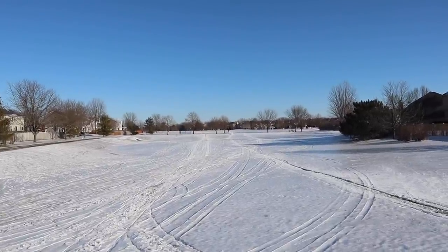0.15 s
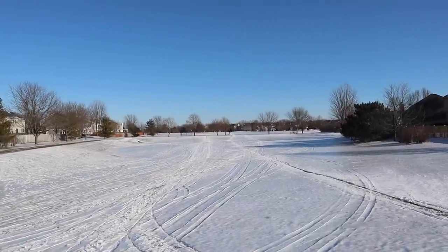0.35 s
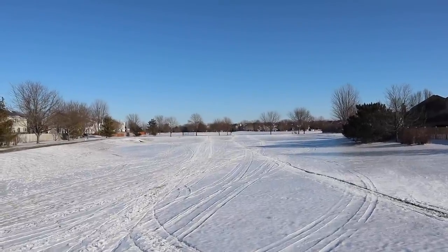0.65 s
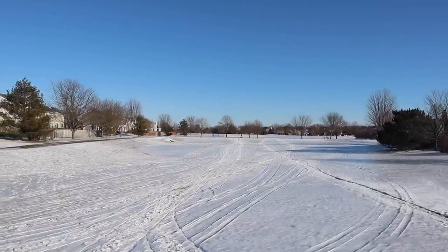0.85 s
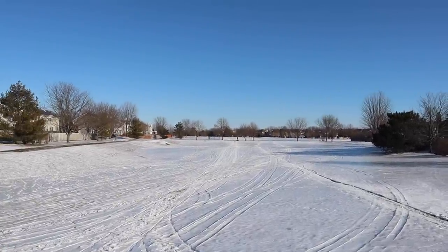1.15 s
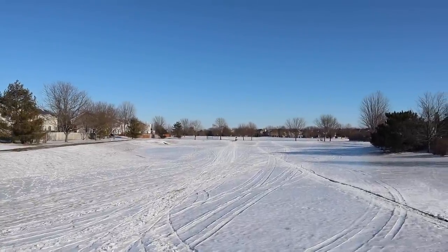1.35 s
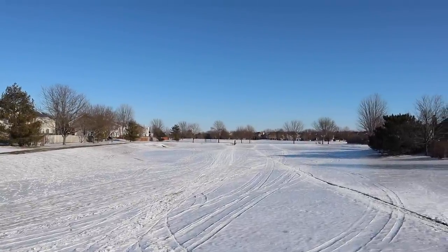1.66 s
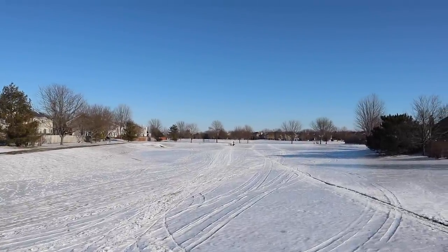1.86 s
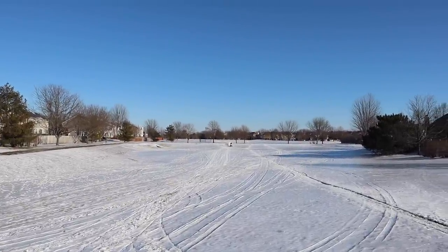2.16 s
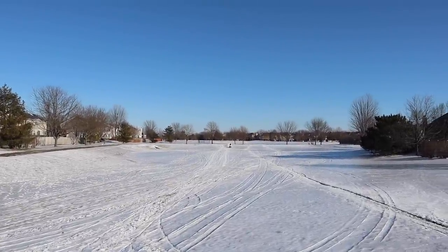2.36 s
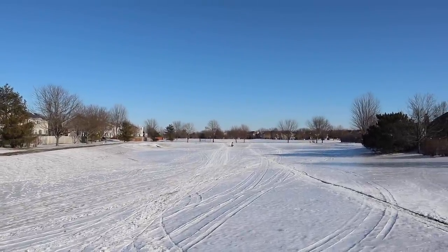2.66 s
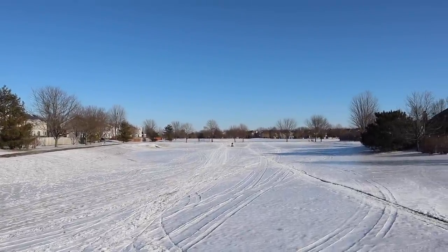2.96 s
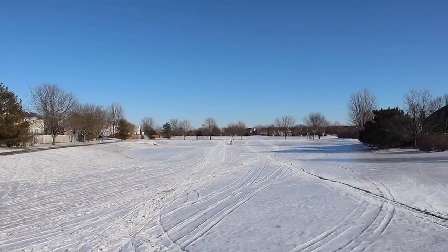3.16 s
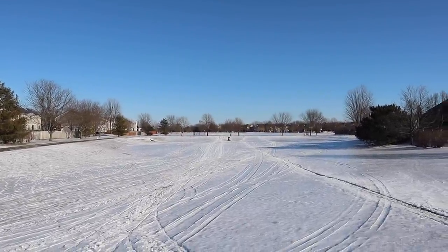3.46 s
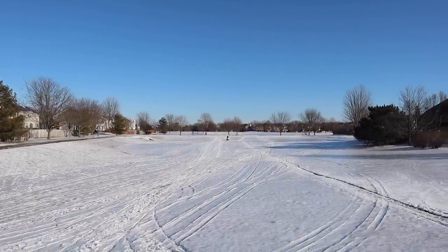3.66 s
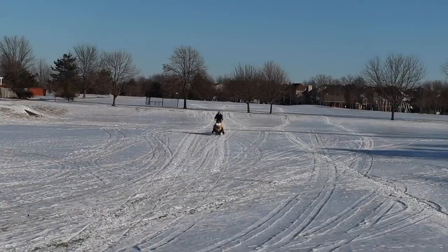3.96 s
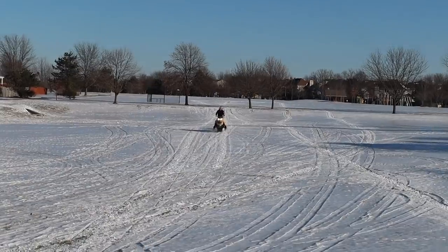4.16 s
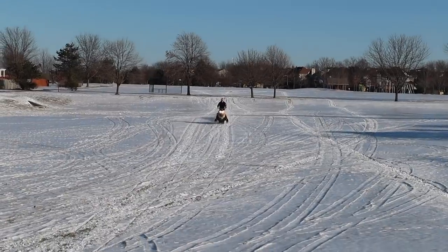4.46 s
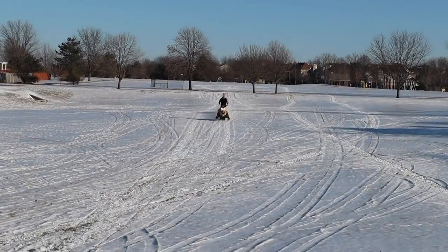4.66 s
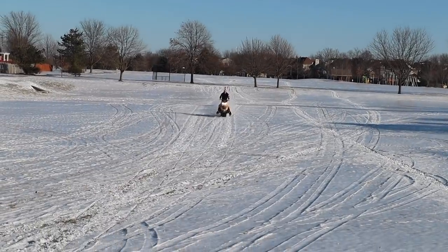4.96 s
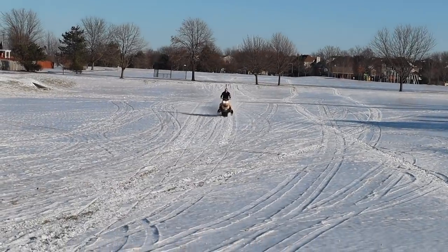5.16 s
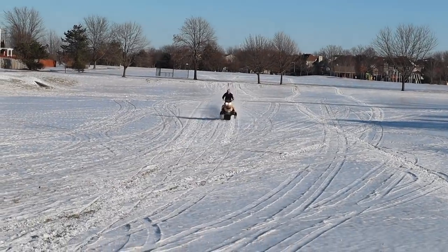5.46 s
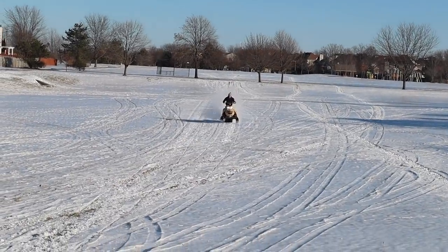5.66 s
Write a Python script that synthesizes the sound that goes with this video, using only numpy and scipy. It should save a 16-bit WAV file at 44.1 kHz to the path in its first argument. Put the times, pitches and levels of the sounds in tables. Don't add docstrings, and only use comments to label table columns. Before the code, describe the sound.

Wind thumps on one outdoor microphone while a far snowmobile buzzes and fades. The engine nearly disappears into a faint idle, then screams up briefly, drops, rises again and slowly falls. A hard cut brings a low start that quickly swells to a sustained, ripping two-stroke wail, flickering and rattling, with late dull echoes from houses and trees.

```python
import sys
import numpy as np
from scipy import signal
from scipy.fft import rfft, irfft, next_fast_len
from scipy.io import wavfile
from scipy.ndimage import uniform_filter1d, map_coordinates

SR = 44100
rng = np.random.default_rng(int(sys.argv[2]) if len(sys.argv) > 2 else 0)


def boost_factor(decibels):
    exponent = np.asarray(decibels, float) / 20
    return 10 ** exponent


def generate_wav(sig):
    pcm = np.round(np.clip(np.atleast_2d(sig).T, -1, 1) * 32767).astype(np.int16)
    wavfile.write(sys.argv[1], SR, pcm)


N = 255471

# (start [s], end [s])
VIEWS = [
    (0, .8907),
    (.8907, 3.8936),
    (3.8936, 5.8),
]
# (time [s], rate [Hz])
FIRING_RATE = [
    [(0, 226), (.08, 243), (.17, 259), (.35, 266), (.55, 265), (.89, 240)],
    [(.891, 150), (1.42, 151), (1.52, 161), (1.7, 221), (1.9, 279), (1.93, 279), (1.96, 255), (2.2, 205)],
    [(2.48, 188), (2.57, 225), (2.7, 263), (2.79, 282), (2.94, 287), (3.04, 281), (3.07, 262), (3.2, 258),
     (3.893, 180)],
    [(3.894, 135), (4.05, 174), (4.21, 231), (4.3, 272), (4.36, 281), (4.8, 278), (5.2, 284), (5.39, 281),
     (5.7, 285)],
]
# (time [s], level under full cry [dB])
EFFORT = [
    [(0, -15), (.1, -11), (.39, -10.5), (.54, -21), (.64, -26.5), (.885, -22.5)],
    [(.895, -73), (1.46, -55), (1.6, -22.5), (1.74, 3.5), (1.905, 0), (1.93, -26), (2.15, -21.5),
     (2.472, -24.5)],
    [(2.483, -22), (2.54, -14), (2.66, -4.5), (3.02, -5), (3.07, -12), (3.24, -16.5), (3.6, -25),
     (3.885, -27)],
    [(3.9, -36.5), (4.1, -1.5), (4.29, 2.5), (4.45, -2), (4.75, -1), (5.2, -1), (5.718, 1.5), (5.79, 17)],
]
# (throttle shuts [s], overtones linger [s], bark lift [dB],
# bark sag as the pipe swings away [dB/s], jet lift [dB])
REVS = [
    (.54, 0.016, -12, -11.5, 1),
    (1.93, 0.19, 2.5, 2, 4.5),
    (3.051, .14, -2, -2.5, 5.5),
    (5.72, 0.025, 7.5, 4, 1),
]
REV_STARTS = [0, .8907, 2.44, 3.8936]
# (frequency [Hz], level [dB])
PIPE_COLOURS = [
    [(150, -55), (250, -35), (523, -6), (636, -5), (763, 6), (1070, 12), (1810, 0), (2430, -1.5),
     (3950, -16), (7000, -31), (9100, -51), (15400, -120)],
    [(150, -35), (250, -6), (561, 1), (1150, 5), (1600, -4), (2400, 0), (3400, -13), (4500, -24),
     (9100, -55)],
    [(130, -34), (280, -14), (560, -16), (845, -12), (1125, 2), (1400, -8), (1680, -8), (1960, -3.5),
     (2250, -4.5), (2530, -7.5), (2810, -9), (3650, -26), (4250, -26), (5400, -29), (7200, -49),
     (9000, -65)],
]
# (frequency [Hz],
# width [Hz], lift [dB])
CHAMBER_AND_GROUND = [(410, 60, -6), (540, 50, 5), (670, 50, -5), (825, 55, 6), (1220, 110, 4), (1650, 80, 5),
                      (2170, 120, 4), (2650, 120, 5), (3300, 120, 8)]
# (time [s], depth)
TURBULENCE = [(0, 1), (.89, 1), (.9, 1.5), (3.89, 1.5), (3.9, 1), (4.25, .8), (4.4, .45), (5.8, .4)]
# (frequency [Hz], level [dB per Hz])
ROAR_COLOUR = [(250, -27.5), (500, -23.5), (680, -18.5), (900, -11.5), (1200, -12), (2200, -6.5),
               (3200, -7.5), (3900, -25.5), (5500, -56), (7000, -52), (12000, -120)]
RATTLE_COLOUR = [(2120, -68), (3600, -6.5), (4390, 1), (5070, 1), (5480, 0), (7100, -10.5), (8500, -18.5),
                 (11000, -60), (18700, -120)]
HISS_COLOUR = [(4120, -4.5), (7000, -11.5), (9040, -12), (12200, -11), (15100, -20), (16000, -25)]
# (start [s], length [s], level [dB])
SNOW_SPRAY = [
    (0, .004, -42.5),
    (2.497, 0.026, -45),
    (3.323, .57, -54.5),
    (3.351, 0.01, -53),
    (3.948, .006, -57),
    (4.05, 0.0085, -62),
    (4.132, 0.01, -43),
    (4.83, 0.081, -34),
    (5.088, 0.1, -39.5),
    (5.583, 0.17, -34),
]
# (time [s], buffet [dB], flutter over buffet [dB], sharpness [dB])
BREEZE = [(0, -22, -0.5, -6.5), (.9, -25, -12, -9), (1.3, -15, -5, -9), (1.75, -31, -13, -8.5),
          (2.2, -26, -7, -10.5), (2.7, -14.5, -8, -7.5), (3.1, -30, -6, -13.5), (3.5, -30.5, -14, -9),
          (3.7, -25.5, -1, -6), (4.15, -18.5, -3, -3), (4.55, -30.5, -4, -14), (4.85, -35, -9, -3),
          (5.1, -32, -0.5, -8), (5.79, -39.5, -7, -7)]
# (time [s], buffet [dB], half width [s], flutter over buffet [dB])
GUSTS = [(0.0, -7, 0.01, -7.5), (0.239, -12.5, 0.039, -15), (0.416, -7.5, 0.018, -27),
         (0.61, -14, 0.019, -14), (0.713, -19.5, 0.022, -1.5), (0.872, -19, 0.035, -9),
         (1.164, -9.6, 0.026, -12.5), (1.303, -13.5, 0.014, -9), (1.407, -9.5, 0.011, -5.5),
         (1.698, -24, 0.035, 1), (1.842, -24, 0.022, -21), (1.971, -14.5, 0.014, -22),
         (2.087, -13.5, 0.038, -8.5), (2.245, -8, 0.012, -13), (2.392, -17, 0.063, -9),
         (2.624, -14.5, 0.027, -2.5), (2.732, -12.5, 0.02, -8), (3.027, -20.5, 0.07, -4.5),
         (3.194, -23.5, 0.069, -3), (3.334, -15.5, 0.022, -6), (3.616, -17, 0.021, -1),
         (3.735, -15, 0.018, -21), (3.811, -23, 0.035, -6.5), (3.944, -17, 0.024, 1.5),
         (4.047, -15, 0.041, -4.5), (4.218, -16.9, 0.024, -7), (4.74, -20, 0.034, -12),
         (4.865, -19.5, 0.041, -7.5), (5.331, -23, 0.041, -18), (5.524, -24.5, 0.046, -13)]
# (frequency [Hz], level [dB per Hz])
BUFFET_COLOUR = [(8.8, -48), (15, -7.5), (32, -4.5), (49, 5), (99, -11.5), (130, -37.5), (170, -14),
                 (290, -120)]
FLUTTER_COLOUR = [(59, -11), (100, 12), (328, -26.5), (455, -20.5), (497, -18), (700, -38), (910, -92),
                  (1540, -120)]
WHIP_COLOUR = [(100, -16), (170, 2), (260, -4.5), (400, -22), (700, -120)]
# (frequency [Hz], level [dB per Hz])
MURMUR_COLOUR = [(290, -8.5), (500, -13.5), (578, -17.5), (729, -14.5), (1280, -19.5), (1570, -22),
                 (9220, -48), (16000, -63)]
# (frequency [Hz], time to fall 60 dB [s])
TREE_DECAY = [(300, 2.2), (1500, 0.95), (4000, 0.45), (10000, 0.44)]
TREES_DB = [-9.5, -10, -13.5]
# (delay [s], pitch ratio, level [dB])
ECHOES = [
    [(.41, 1.055, -5)],
    [(.22, 1, -15), (.47, 1, -23), (.85, 1, -24)],
    [(.22, 1, -23), (.47, 1, -24)],
]
# (start [s], end [s])
IDLE_S = (.8907, 1.55)
# (time [s], level [dB])
SCENE_STEPS = [
    (0.8902, -20.5),
    (3.8934, -8.5),
]
# (start [s], length [s], level [dB])
SHORT_RING = (2.1, 0.034, -34.5)
# (frequency [Hz], level [dB per Hz])
SHORT_RING_COLOUR = [(2500, -40), (3150, -12), (3300, 6), (3450, -13), (4200, -16), (4800, -7), (6500, -51)]
# (time [s], rate [Hz])
LUG_RATE = [(0, 122), (4.3, 92.4), (4.45, 113), (4.7, 159), (5.1, 171), (5.8, 179.5)]

TUNED_HZ = 266


def unit(x):
    return x / np.sqrt(np.mean(x ** 2) + 1e-20)


def along(points, hz):
    f, v = np.transpose(points)
    return np.interp(np.log(hz + 1), np.log(f + 1), v)


def curves(rows, t):
    s, *cols = np.transpose(rows)
    return [np.interp(t, s, c) for c in cols]


def wobble(rate, t):
    knots = np.convolve(rng.standard_normal(400), [.5, 1, .5])
    return np.interp(t * rate, np.arange(402), knots)


def window(t, start_s, length_s, edge_s):
    nearest_edge = np.minimum(t - start_s, start_s + length_s - t)
    return np.clip(nearest_edge / edge_s + 1, 0, 1)


def coloured(x, points):
    m = next_fast_len(len(x) + 8192)
    gain = boost_factor(along(points, np.fft.rfftfreq(m, 1 / SR)))
    return irfft(rfft(x, m) * gain, m)[:len(x)]


def noise(points, gate):
    return unit(coloured(gate * rng.standard_normal(len(gate)), points))


def shimmer(t, cell_hz, cell_s):
    cells = rng.standard_normal((130, 80))
    return lambda hz: map_coordinates(cells, [t / cell_s, hz / cell_hz], order=1, mode="wrap")


def overtones(t, hz, turn, pipe, count):
    coarse = t[::64]
    slow, fast = shimmer(coarse, 130, .3), shimmer(coarse, 170, .035)
    drift = shimmer(coarse, 400, .07)
    depth = curves(TURBULENCE, coarse)[0]
    tone = np.zeros(len(t))
    for k in range(1, count + 1):
        f = k * np.interp(coarse, t, hz)
        fade_db = depth * np.clip(k / 7, .3, .8) * (2 * slow(f) + 8 * fast(f))
        lift_db = sum(db * np.exp(-((f - mode_hz) / wide_hz) ** 2) for mode_hz, wide_hz, db in CHAMBER_AND_GROUND)
        slid = f * (k * TUNED_HZ / f) ** 0.4
        gain = boost_factor(along(pipe, slid) + lift_db - 5 + np.minimum(fade_db, 6))
        blur = .2 * k * np.sqrt(depth) * drift(f)
        phase = k * turn + np.interp(t, coarse, blur) + rng.normal(0, 1)
        tone += np.interp(t, coarse, gain) * np.cos(phase)
    power = sum(boost_factor(along(pipe, k * 280)) ** 2 for k in range(1, count + 1)) / 2
    return tone / np.sqrt(power)


def exhaust_roar(t, puff):
    scatter_db = 3 * curves(TURBULENCE, t)[0]
    return boost_factor(-17 + scatter_db + 1.5 * wobble(40, t)) * noise(ROAR_COLOUR, puff)


def metal_rattle(t, top, crack):
    return boost_factor(23.5) * top + boost_factor(-7 + 2.1 * wobble(40, t)) * noise(RATTLE_COLOUR, crack)


def gas_hiss_and_snow(t, jet_db, puff, crack):
    snow = sum(boost_factor(db) * window(t, s, length, 0.0039) for s, length, db in SNOW_SPRAY)
    jet = np.hypot(boost_factor(jet_db), snow)
    unsteady = boost_factor(0.73 * wobble(29.65, t) + 1.3 * wobble(9, t))
    hiss = jet * unsteady * noise(HISS_COLOUR, np.sqrt(crack))
    return hiss + boost_factor(3) * snow * noise(RATTLE_COLOUR, puff)


def wind(t):
    breeze_db, flutter_db, sharp_db = curves(BREEZE, t)
    deep, fast = boost_factor(2 * breeze_db), boost_factor(2 * (breeze_db + flutter_db))
    for s, db, wide_s, rel_db in GUSTS:
        swell = np.exp(-((t - s) / wide_s) ** 2)
        deep = deep + boost_factor(2 * db) * swell
        fast = fast + boost_factor(2 * (db + rel_db)) * swell
    buffet = noise(BUFFET_COLOUR, np.ones(len(t)))
    buffet /= np.sqrt(np.abs(uniform_filter1d(buffet ** 2, size=1800)) + .3)
    flutter = noise(FLUTTER_COLOUR, boost_factor(1.73 * wobble(39.99, t)))
    whip = boost_factor(sharp_db) * noise(WHIP_COLOUR, boost_factor(3.6 * wobble(50, t)))
    return np.sqrt(deep) * buffet + np.sqrt(fast) * (flutter + whip)


def far_murmur(t):
    return boost_factor(-42.5) * noise(MURMUR_COLOUR, np.ones(len(t)))


def tree_tail(x, trees_db):
    hz, t, z = signal.stft(rng.standard_normal(SR + SR // 2), SR, nperseg=256)
    decay = boost_factor(-60 * t / along(TREE_DECAY, hz)[:, None])
    onset = np.clip(t / 0.058, 0, 1)
    tail = signal.istft(z * decay * onset, SR, nperseg=256)[1]
    diffuse = boost_factor(trees_db) * signal.fftconvolve(x, tail / np.linalg.norm(tail))[:len(x)]
    return coloured(diffuse, [(600, -8), (900, -1.5), (1400, 3.0), (2200, 4)])


def house_echoes(x, echoes):
    i = np.arange(len(x))
    late = np.zeros(len(x))
    for s, ratio, db in echoes:
        waver = .0003 * wobble(45, i / SR)
        copy = np.interp(i * ratio - (s + waver) * SR, i, x, left=0)
        late += boost_factor(db + 4 * wobble(30, i / SR)) * copy
    return coloured(late, [(300, -14), (600, -18), (800, -2), (1300, 0), (1800, -7), (4000, -11), (8000, -22)])


def idle_drone(t, turn):
    idling = window(t, IDLE_S[0], IDLE_S[1] - IDLE_S[0], 0.037)
    return idling * boost_factor(-47.5 + 2 * wobble(20, t)) * np.cos(3 * turn)


def scene_steps(t):
    return sum(-boost_factor(db) * (t >= s) * np.exp(-np.abs(t - s) / 0.0039) for s, db in SCENE_STEPS)


def ringing_scrape(t, puff):
    start_s, length_s, db = SHORT_RING
    return boost_factor(db) * window(t, start_s, length_s, .002) * noise(SHORT_RING_COLOUR, puff)


def track_lugs(t, turn):
    lug = 2 * np.pi * np.cumsum(curves(LUG_RATE, t)[0]) / SR
    side = boost_factor(-16.5) * np.cos(2 * lug)
    for k, db in [(4, -14), (5, -4), (6, -9), (7, -15)]:  # (overtone, dB)
        side += boost_factor(db + 3 * wobble(12, t)) * np.cos(k * turn - lug)
    bite_s = 4.3
    return window(t, bite_s + .1, 2, .1) * boost_factor(-13 - 4 * (t - bite_s)) * side


def engine(t, pipe):
    hz = curves(np.concatenate(FIRING_RATE), t)[0]
    effort_db = curves(np.concatenate(EFFORT), t)[0]
    rev = np.searchsorted(REV_STARTS, t, "right") - 1
    shut_s, linger_s, lift_db, sag_db, jet_db = np.array(REVS)[rev].T
    shut = np.clip((t - shut_s) / .03, 0, 1)
    coast = np.clip((t - shut_s - linger_s) / .06, 0, 1)

    turn = 2 * np.pi * np.cumsum(hz * (1 + 0.002955 * wobble(30, t))) / SR
    puff, crack = 1 + 0.27 * np.cos(turn), np.exp(.8 * np.cos(turn))

    shut_db, coast_db = -6, -25
    clean_db = (1 - shut) * .035 * (hz - 200) + shut * shut_db + coast * (coast_db - shut_db)
    tones = boost_factor(clean_db - 5.0) * overtones(t, hz, turn, pipe, count=26)
    body = tones + exhaust_roar(t, puff) + track_lugs(t, turn)

    rasp = coloured(body, [(1300, -60), (1400, -15), (1800, 0)])
    top = coloured(body, [(3300, -60), (3400, -15), (3900, 0)])
    bark_db = -13 + 0.66 * effort_db + lift_db - sag_db * (t - np.array(REV_STARTS)[rev])
    keen_db = 0.026 * (hz - TUNED_HZ)
    rattle_db = -24.5 + 1.07 * effort_db - 2 * shut + keen_db
    hiss_db = -37.5 + 1.15 * effort_db - 10 * shut + jet_db + keen_db

    out = boost_factor(bark_db) * (body - rasp) + boost_factor(-10 + effort_db) * (rasp - top)
    out += boost_factor(rattle_db) * metal_rattle(t, top, crack)
    out += gas_hiss_and_snow(t, hiss_db, puff, crack)
    return out + idle_drone(t, turn) + ringing_scrape(t, puff)


def scene():
    t = np.arange(N) / SR
    out = wind(t) + scene_steps(t) + far_murmur(t)
    for (a, b), pipe, echoes, trees_db in zip(VIEWS, PIPE_COLOURS, ECHOES, TREES_DB):
        view = (t >= a) & (t < b)
        direct = engine(t[view], pipe)
        heard = direct + house_echoes(direct, echoes) + tree_tail(direct, trees_db)
        out[view] += heard * boost_factor(-11 * window(t[view], 5.7268, 1, 0.0036))
    return out[None]


def band_limit(x):
    return signal.sosfilt(signal.butter(12, 16300, fs=SR, output="sos"), x)


def record(dry):
    mix = dry / (1 + np.abs(dry) ** 6) ** (1 / 6)
    return band_limit(mix)


dry = scene()
out = record(dry)
generate_wav(out)
```